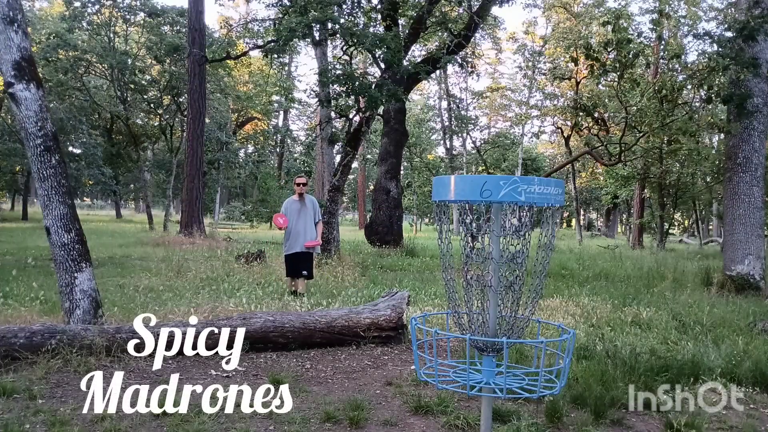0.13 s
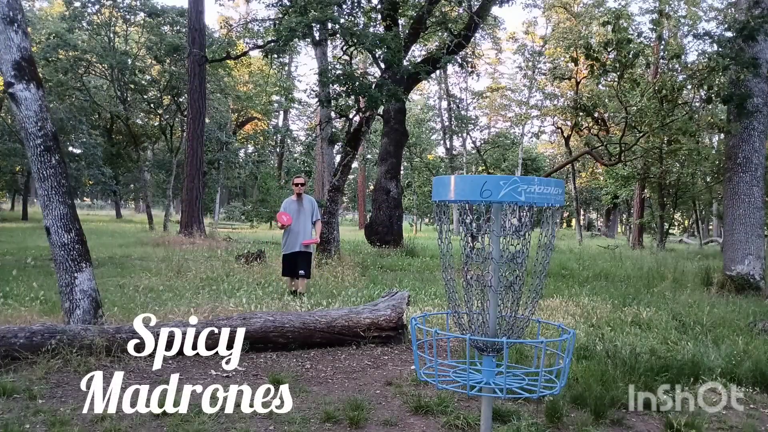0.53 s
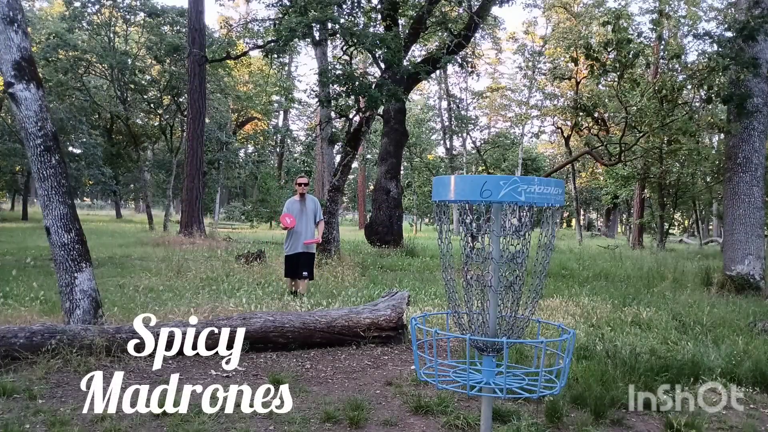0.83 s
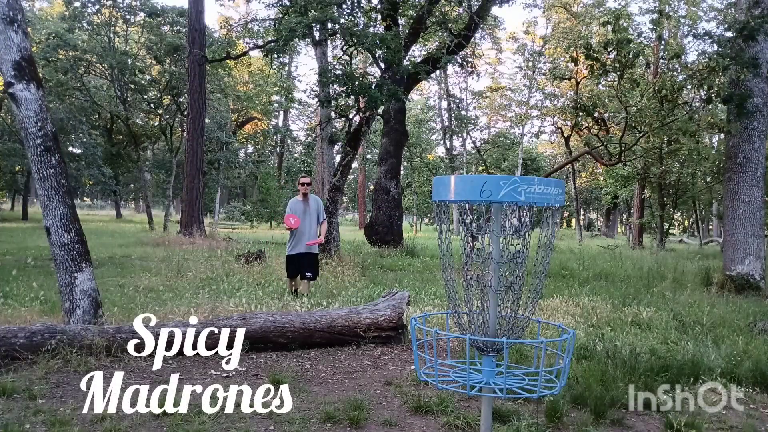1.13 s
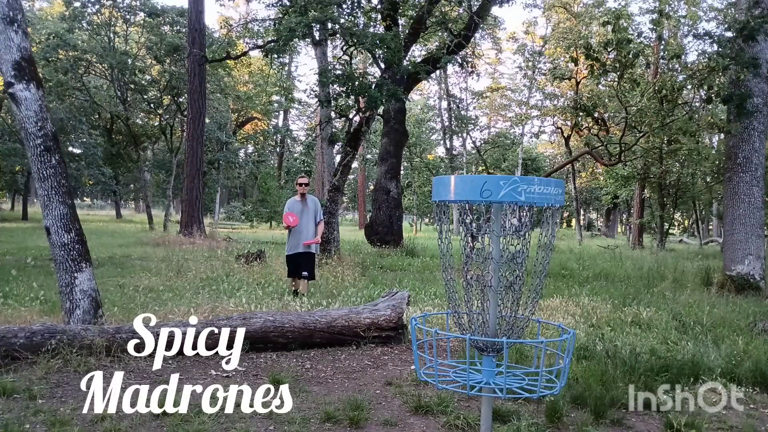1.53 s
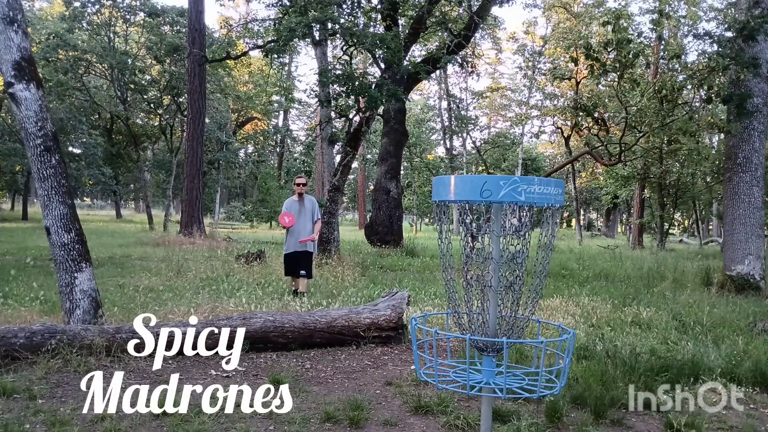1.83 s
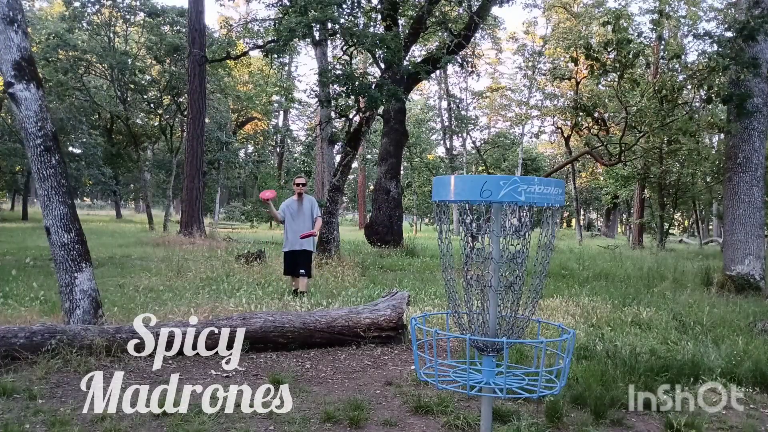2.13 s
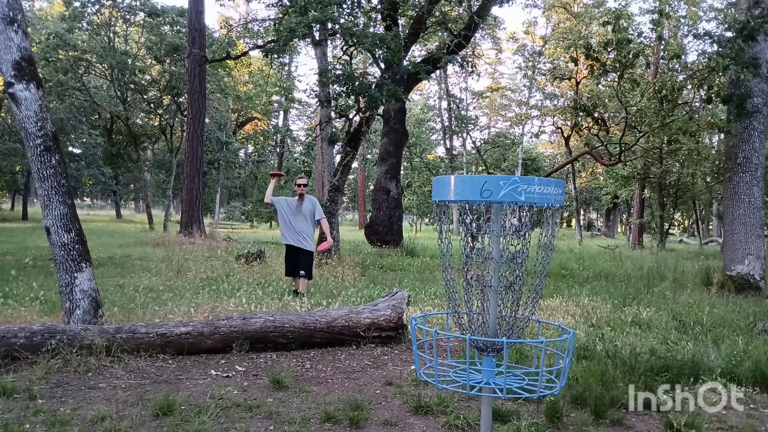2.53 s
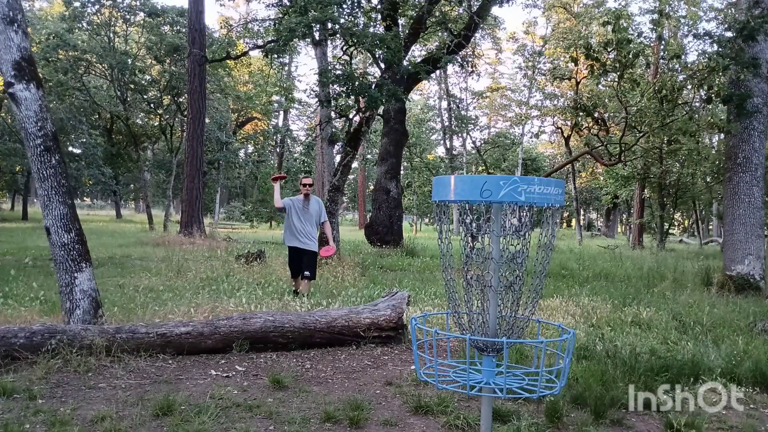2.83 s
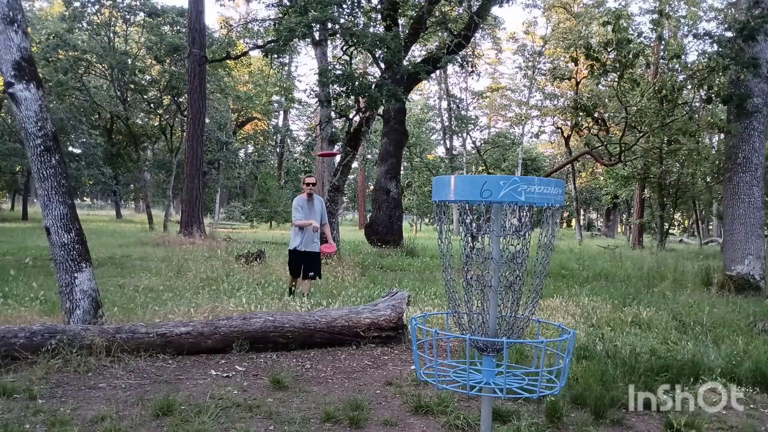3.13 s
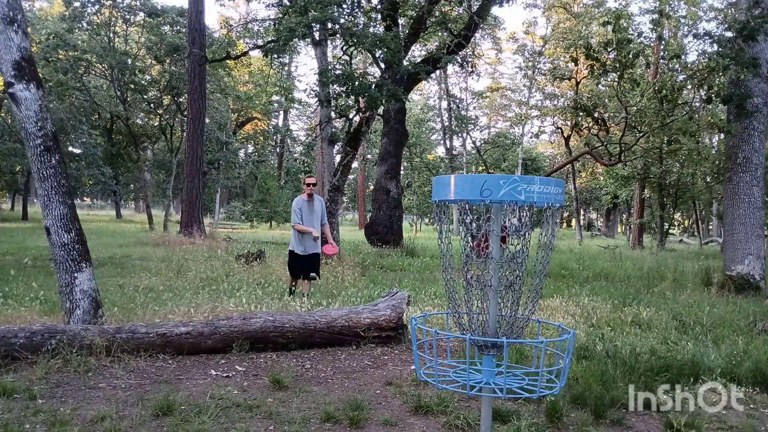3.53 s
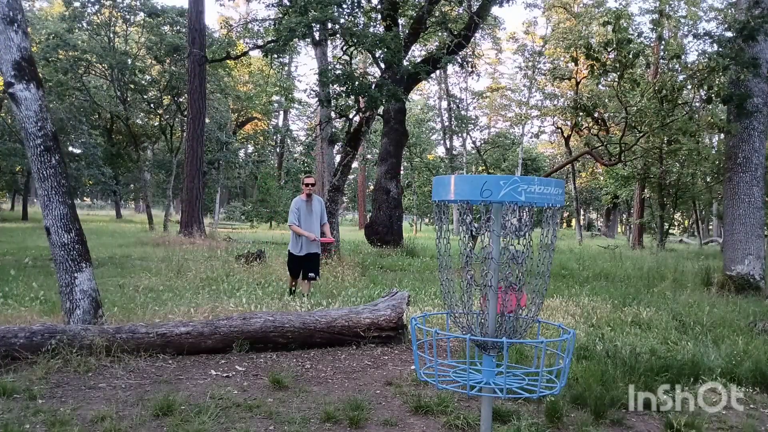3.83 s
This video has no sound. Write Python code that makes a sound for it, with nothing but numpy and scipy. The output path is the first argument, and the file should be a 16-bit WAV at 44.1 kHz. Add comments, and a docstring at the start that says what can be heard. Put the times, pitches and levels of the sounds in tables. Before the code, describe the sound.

Metal chains burst into loud jangling near the microphone as a disc strikes with a dull plastic knock; beforehand, only low far traffic, a faint engine hum and small bird calls among trees.

```python
"""Disc into a chain basket

In a wooded park, far traffic and a hum are heard first, with thin bird chips and a buzzy call.
Then a thrown disc hits the hanging chains of a metal basket, a little left of a two-port microphone.
Traffic is shaped noise, the hum is narrow noise, and the birds are gliding tones and noise notes.
Random blows make steel links ring and clatter; the plastic disc knocks in its own dying tones.
A gain control turns everything down under the loud rattle and recovers slowly.
"""
import sys
import numpy as np
from scipy import signal
from scipy.fft import rfft, irfft
from scipy.io import wavfile
from scipy.ndimage import uniform_filter1d

SR = 44100
rng = np.random.default_rng(int(sys.argv[2]) if len(sys.argv) > 2 else 0)


def ratio(d):
    """dB to gain"""
    e = np.asarray(d, float) / 20
    return 10 ** e


def output_pcm(signal):
    """Save a mono or channel-first signal as 16-bit PCM at the path in sys.argv[1].

    Samples are clipped to [-1, 1] before scaling.
    """
    pcm = np.clip(np.atleast_2d(signal).T, -1, 1) * 32767
    wavfile.write(sys.argv[1], SR, np.round(pcm).astype(np.int16))


N = 176400  # samples in the scene: 4 s

# Colour of far traffic and air: f/Hz, relative level/dB
ROAD_SPECTRUM = [(30, -24), (60, -23), (80, -7.5), (100, 2.5), (125, -4.5), (160, -5), (204, -11),
                 (260, -17), (337, -22.5), (434, -13.5), (558, -12.5), (825, -7), (1570, -15),
                 (1910, -19.5), (2990, -44), (4500, -47.5), (7520, -54), (11000, -57.5), (16000, -54)]
# Likeness of left and right traffic: f/Hz, likeness (1 = same, 0 = unrelated)
ROAD_LIKENESS = [(60, 0.95), (150, 0.95), (380, 0.52), (950, 0.0031), (2380, 0.00046), (5980, -0.096),
                 (15000, -0.16)]
# Slow traffic drift, used about its average: t/s, bass level/dB, low-middle level/dB
RUMBLE_DRIFT = [(0.0, -47.5, -59), (0.05, -54, -58.5), (0.31, -49, -60), (0.44, -48.5, -56.5),
                (0.78, -49, -59), (0.79, -48.5, -54), (1.09, -50.5, -61), (1.43, -50.5, -58),
                (2.64, -51.5, -63.5), (3.58, -56.5, -63)]
ROAD_RMS_DB, PATCHY_DB, SWELL_DB = -45, 0.9, -0.21
# Engine whine: t/s, f/Hz, level/dB
HUM_TRACK = [(0, 447.3, -55.5), (.5, 443, -61.5), (.75, 446.4, -55), (1.1, 447.4, -59.5), (1.4, 435, -53),
             (2.0, 438.5, -56), (2.6, 444, -62.5), (2.8, 443, -78), (3.5, 433.4, -65)]
HUM_WIDTH_HZ = 13.0  # of each of two resonances in a row

# Short bird notes: t/s, length/s, f/Hz, width/Hz, level/dB
BIRD_CHIPS = [(0.379, 0.026, 4540, 250, -67.5), (.385, 0.029, 3250, 250, -66),
              (0.41, 0.025, 4600, 200, -74), (0.451, .02, 3220, 250, -72), (0.457, 0.024, 4330, 250, -74),
              (1.274, 0.044, 7700, 60, -82), (1.325, .035, 7400, 80, -87), (1.41, .03, 7520, 80, -89),
              (2.544, .04, 7450, 49, -79), (2.66, .04, 7600, 100, -82), (2.764, .04, 7320, 80, -90)]
CHIP_FALL = 0.02  # share of its pitch that each chip drops
# Buzzy bird call: t/s, centre f/Hz, level/dB, tremble each way/Hz
BUZZY_CALL = [(.47, 3330, -59, 60), (.49, 3440, -61, 59.6), (.53, 3523, -64, 80), (.545, 3605, -54.5, 200),
              (.575, 3660, -73, 200), (.585, 3790, -64, 250), (.62, 3880, -59.5, 293),
              (.7, 3995, -61.5, 390), (.76, 3900, -62, 395), (.8, 3840, -66.5, 450), (.86, 3930, -73, 400)]
BUZZ_PER_S, BUZZ_WANDER = 170, 0.13
BIRD_ECHO_DB, BIRD_ECHO_T60_S = -1, 0.58

# How hard the links clash: t/s, clatter level/dB, low, middle and high ring levels/dB
CHAIN_SHAKE = [(3.608, -17, -41, -22, -28), (3.616, -19, -38, -32, -27), (3.632, -6, -20, -40, -7.5),
               (3.656, -21.5, -16, -3.5, -22), (3.692, -13.5, -10.5, -14.5, -18),
               (3.726, -33, -56, -44, -29), (3.744, -17, -17, -31, -44), (3.756, -30, -22, -20, -19),
               (3.782, -18, -25, -20, -20), (3.802, -18, -25, -30, -26), (3.818, -18, -9.5, -10, -12),
               (3.84, -18.5, -26, -26, -11), (3.858, -19, -15, -7, -24), (3.896, -23, -20, -19.5, -4),
               (3.936, -17.5, -22, -3, -34), (3.946, -17, -50, -36, -13), (3.966, -29.5, -23, -19, -20),
               (4.0, -20, -23, -25.5, -23)]
# Low ringing tones of the links: f/Hz, relative level/dB, time to fall 60 dB/s
LOW_LINK_MODES = [(3385, -13, .15), (3413, -6, .3), (3432, 0, .33), (3450, -6, .25), (3485, -12, .15)]
# Middle ringing tones of the links: f/Hz, relative level/dB, time to fall 60 dB/s
MIDDLE_LINK_MODES = [(9489, 0, .33), (9540, 0, .33), (9585, -3, .33), (9610, -8, .4), (9691, -9, .45),
                     (9793, -11, .4), (9945, -14, .3), (10092, -15, .4)]
# High tones differ from link to link, so each row is a crowd:
# centre f/Hz, spread/Hz, relative level/dB, time to fall 60 dB/s
HIGH_LINK_CROWDS = [(14150, 130, 0, .16), (14790, 90, -3, .16), (15350, 150, -13, .12),
                    (10150, 280, -8, .15)]
LINKS = 14  # tones in each crowd
RING_HITS_PER_S, RING_SIZE_DB = 220, 3.2
# Colour of short unpitched link contacts: f/Hz, relative level/dB
CLATTER_SPECTRUM = [(300, -43), (700, -19), (1530, -12), (2600, -20), (3100, -25.5), (3500, -7), (4500, -9),
                    (5700, -10.5), (7300, -9), (8600, -7), (9700, -8), (12300, -10.5), (14000, -3.5),
                    (15300, 2), (16000, -50)]
CLATTER_PER_S, CLATTER_SIZE_DB, CLATTER_T60_S = 1400, 4.2, 0.025  # rate over both strands
WIRE_T60_S, WIRE_DB = 0.085, -1  # wire level against the contacts
# Disc strikes chain and pole: t/s, level/dB, tilt/dB per octave
DISC_KNOCKS = [(3.608, -16, 5), (3.646, -8, -1.5), (3.752, -22.5, -1), (3.829, -36, 1)]
# Tones of the disc: f/Hz, relative level/dB, time to fall 60 dB/s
DISC_MODES = [(330, -7, .09), (500, -11, .05), (700, 3, .05), (955, 1, .05), (1150, -7, .05),
              (1550, -4, .07), (1780, -6, .05), (2300, -9, .04)]
KNOCK_RISE_S, SLAP_DB, SLAP_T60_S = 0.004, -9, 0.03
# Hard link clashes: t/s, crack level/dB, crack f/Hz, middle ring level/dB
HARD_CLASHES = [(3.609, -23, 4000, -48), (3.615, -10, 5720, -35), (3.621, -5, 5830, -17),
                (3.626, -18, 3920, -16), (3.637, -24, 5030, -12), (3.648, -3.5, 14900, -19),
                (3.659, -16.5, 10300, -10.5), (3.685, -36, 9800, -28), (3.795, -44, 7950, -13),
                (3.834, -31, 4500, -13), (3.886, -31, 7000, -28), (3.943, -18, 7000, -26.5)]
CLASH_T60_S, CLASH_WIDTH = 0.044, 0.44  # width as a share of the pitch

# Level difference of the ports: f/Hz, left minus right level/dB
PORT_LEVELS = [(300, 0), (1300, 1), (3400, 4), (5500, 1), (7500, 2), (9500, 6), (12000, 1), (14500, 0)]
# Full phase lead of the left port: f/Hz, lead/rad
PORT_LEAD = [(0, 0), (1700, .8), (3400, 2.5), (5200, 1.9), (6400, 3.1), (9500, 5.2), (16000, 8.3)]
NEAR_SHARE, FAR_SHARE = 0.94, 0.62  # shares of that lead; far strands hang more to the front
TREES_DB, TREES_T60_S = -7.5, 0.1
MIC_LOW_CUT_HZ, MIC_HIGH_CUT_HZ = 36.4, 15750
AGC_KNEE_DB, AGC_SHARE = -29, 0.3  # the gain drops by this share of the dB above the knee
AGC_FORGET_DB_PER_S = 25  # how fast a remembered peak sinks


def evened(x):
    """Scales a sound to an rms of 1."""
    return x / np.sqrt(np.mean(x ** 2) + 1e-20)


def read(points, hz):
    """Reads a table in even steps of pitch, with straight lines between its points."""
    f, value = np.transpose(points)
    return np.interp(np.log(hz + 1), np.log(f + 1), value)


def curve(rows, column):
    """Draws one column of a table as a line over the scene's time."""
    rows = np.array(rows)
    return np.interp(np.arange(N) / SR, rows[:, 0], rows[:, column])


def add(mix, s, sound):
    """Mixes a sound in at s seconds, cutting off what runs past the end."""
    part = mix[round(s * SR):][:len(sound)]
    part += sound[:len(part)]


def resonate(x, hz, width):
    """A resonance of peak gain 1 that can follow a pitch curve."""
    turn = np.exp(2j * np.pi * np.cumsum(hz * np.ones(len(x))) / SR)
    r = np.exp(-np.pi * width / SR)
    # Shift the pitch down to zero, smooth, then shift it back.
    return 2 * (turn * signal.lfilter([1 - r], [1, -r], x / turn)).real


def narrow_noise(count, hz, width):
    """Noise through two equal resonances in a row, which leaves a rough pitch."""
    return resonate(resonate(rng.standard_normal(count), hz, width), hz, width)


def colour(x, points):
    """Filters by a spectrum table without smearing sound ahead of its start."""
    db = np.maximum(read(points, np.fft.rfftfreq(2048, 1 / SR)), -100)
    log = np.log(ratio(np.r_[db, db[-2:0:-1]]))
    # This phase makes the filter answer as early as it can.
    response = np.fft.ifft(np.exp(log - 1j * signal.hilbert(log).imag)).real[:1024]
    return signal.oaconvolve(x, response)[:len(x)]


def clicks(count, per_s, size_db):
    """Sparse random blows of uneven size and sign, scaled to rms 1."""
    chance = rng.random(count)
    size = np.minimum(rng.exponential(1, count), 4)
    sign = rng.choice([-1., 1.], count)
    return evened((chance < per_s / SR) * sign * ratio(size_db * size) + 1e-9)


def ring(hz, t60):
    """A dying sine of energy 1, the answer of one tone to a blow."""
    t = np.arange(SR // 2) / SR
    tone = ratio(-60 * t / t60) * np.sin(2 * np.pi * hz * t)
    return tone / np.linalg.norm(tone)


def tail(t60):
    """Scattered echoes from trunks and ground, different in each channel, that die away."""
    t = np.arange(SR) / SR
    taps = rng.standard_normal((2, SR)) * (rng.random((2, SR)) < .05)
    taps = taps * ratio(-60 * t / t60) * (t > .002)
    return taps / np.linalg.norm(taps[0])


def road():
    """Far traffic: patchy, swelling noise whose low end drifts down overall as the traffic leaves."""
    frames, hz = N // 512 + 5, np.fft.rfftfreq(2048, 1 / SR)
    a, b, c, d, patches = rng.standard_normal((frames, 1025, 5)).T
    patches = uniform_filter1d(patches, size=16, axis=0)
    patches = evened(uniform_filter1d(patches, size=5, axis=1))
    swell = evened(uniform_filter1d(rng.standard_normal(frames), size=15))
    at = np.minimum(np.arange(frames) * 512, N - 1)
    bass, low = (curve(RUMBLE_DRIFT, column=k)[at] for k in (1, 2))
    is_bass, is_low = hz < 220, (hz >= 220) & (hz < 420)
    drift = is_bass[:, None] * (bass - bass.mean()) + is_low[:, None] * (low - low.mean())
    same = np.clip(read(ROAD_LIKENESS, hz), -1, 1)[:, None]
    left = a + 1j * b
    right = same * left + np.sqrt(1 - same ** 2) * (c + 1j * d)
    level_db = read(ROAD_SPECTRUM, hz)[:, None] + PATCHY_DB * patches + SWELL_DB * swell + drift
    spectra = np.array([left, right]) * ratio(level_db)
    wash = signal.istft(spectra, nperseg=2048, noverlap=1536)[1][:, :N]
    return ratio(ROAD_RMS_DB) * wash / np.sqrt(np.mean(wash.mean(0) ** 2))


def hum():
    """Engine whine: narrow noise that follows a pitch and level curve."""
    whine = narrow_noise(N, curve(HUM_TRACK, column=1), HUM_WIDTH_HZ)
    return ratio(curve(HUM_TRACK, column=2)) * evened(whine)


def bird_chips():
    """Thin short notes: narrow noise that falls slightly in pitch."""
    out, t = np.zeros(N), np.arange(4000) / SR
    for s, length, centre_hz, width, db in BIRD_CHIPS:
        hz = centre_hz * (1 + CHIP_FALL * (.5 - t / length))
        note = narrow_noise(len(t), hz, width)[:round(length * SR)]
        add(out, s, ratio(db) * evened(note) * np.hanning(len(note)) ** .5)
    return out


def buzzy_call():
    """A tone whose pitch trembles fast enough to sound like a buzz."""
    t = np.arange(N) / SR
    wander = uniform_filter1d(rng.standard_normal((2, N)), size=300)
    rate_wander, pitch_wander = BUZZ_WANDER * evened(wander)
    tremble = np.sin(2 * np.pi * np.cumsum(BUZZ_PER_S * (1 + rate_wander)) / SR) + pitch_wander
    hz = curve(BUZZY_CALL, column=1) + curve(BUZZY_CALL, column=3) * tremble
    fade = np.clip(np.minimum(t - BUZZY_CALL[0][0], BUZZY_CALL[-1][0] - t) / .01, 0, 1)
    return fade * ratio(curve(BUZZY_CALL, column=2)) * np.sin(2 * np.pi * np.cumsum(hz) / SR)


def birds():
    """Chips and buzzy call together, blurred by echoes from the trees."""
    calls = bird_chips() + buzzy_call()
    echo = signal.fftconvolve(calls[None], tail(BIRD_ECHO_T60_S), axes=1)[:, :N]
    return calls + ratio(BIRD_ECHO_DB) * echo


def link_ringing():
    """Random blows and hard clashes set off the links' tones; returns near and far strands."""
    start = round(CHAIN_SHAKE[0][0] * SR)
    n, strands = N - start, np.zeros((2, N))
    hard = np.zeros(N)
    for s, _, _, ring_db in HARD_CLASHES:
        add(hard, s, ratio(ring_db) * np.array([30.]))
    spots = (np.arange(LINKS) + rng.random(LINKS)) / LINKS * 4 - 2
    crowd = [(hz + spread * z, db - 4.3 * z ** 2, t60)
             for hz, spread, db, t60 in HIGH_LINK_CROWDS for z in spots]
    for column, modes in zip((2, 3, 4), (LOW_LINK_MODES, MIDDLE_LINK_MODES, crowd)):
        level = ratio(curve(CHAIN_SHAKE, column=column)[start:])
        total = np.linalg.norm([ratio(db) for _, db, _ in modes])
        for k, (hz, db, t60) in enumerate(modes):
            blows = level * clicks(n, RING_HITS_PER_S, RING_SIZE_DB)
            if column == 3:  # hard clashes drive only the middle ring
                blows = blows + hard[start:]
            # High tones take turns between strands; the others stay near.
            strand = k % 2 if column == 4 else 0
            strands[strand, start:] += ratio(db) / total * signal.fftconvolve(blows, ring(hz, t60))[:n]
    return strands


def clatter():
    """Short noisy link contacts and flicked basket wires, made separately for near and far strands."""
    start = round(CHAIN_SHAKE[0][0] * SR)
    n, t, strands = N - start, np.arange(4000) / SR, np.zeros((2, N))
    level = ratio(curve(CHAIN_SHAKE, column=1)[start:])
    for strand in strands:
        contacts, wires = np.zeros(n), np.zeros(n)
        for noise in rng.standard_normal((4, len(t))):
            grain = noise * ratio(-60 * t / CLATTER_T60_S)
            # Four grains on each of two strands share the full rate.
            contacts += signal.fftconvolve(clicks(n, CLATTER_PER_S / 8, CLATTER_SIZE_DB), grain)[:n]
        for hz in np.geomspace(3700, 13000, num=40) * rng.uniform(0.93, 1.03, size=40):
            wires += signal.fftconvolve(clicks(n, 40, 3.4), ring(hz, WIRE_T60_S))[:n]
        rattle = colour(evened(contacts) + ratio(WIRE_DB) * evened(wires), CLATTER_SPECTRUM)
        add(strand, start / SR, level * evened(rattle) / np.sqrt(2))
    return strands


def disc():
    """Each knock sets off the disc's dying tones with a short soft rise, plus a dull noise slap."""
    out, t = np.zeros(N), np.arange(8000) / SR
    for s, db, tilt_db in DISC_KNOCKS:
        body = np.zeros(len(t))
        for hz, mode_db, t60 in DISC_MODES:
            level = ratio(mode_db + tilt_db * np.log2(hz / 1000) - 60 * t / t60)
            body += level * np.sin(2 * np.pi * (hz * t + rng.random()))
        body *= np.minimum(t / KNOCK_RISE_S, 1)
        slap = evened(narrow_noise(len(t), 1900, 1500))
        slap = slap * ratio(SLAP_DB + tilt_db - 60 * t / SLAP_T60_S)
        add(out, s, ratio(db) * (body / 3 + slap))
    return out


def hard_clashes():
    """Cracks of dying, roughly pitched noise, taking turns between near and far strands."""
    strands, t = np.zeros((2, N)), np.arange(4000) / SR
    for k, (s, db, hz, _) in enumerate(HARD_CLASHES):
        crack = narrow_noise(len(t), hz, CLASH_WIDTH * hz)
        add(strands[k % 2], s, ratio(db - 60 * t / CLASH_T60_S) * evened(crack))
    return strands


def ports(x, share):
    """A near source reaches the two ports with a phase lead and a level difference."""
    hz = np.fft.rfftfreq(N + SR, 1 / SR)
    lead = share * np.interp(hz, *np.transpose(PORT_LEAD))
    # Each port takes half of the difference, in opposite directions.
    side = ratio(read(PORT_LEVELS, hz) / 2) * np.exp(.5j * lead)
    return irfft(rfft(x, N + SR) * np.array([side, 1 / side]), N + SR)[:, :N]


def scene():
    """Basket nearby with echoes from the trees; road, hum and birds around it."""
    background = road() + hum() + birds()
    near, far = link_ringing() + clatter() + hard_clashes()
    near = near + disc()
    echo = signal.fftconvolve((near + far)[None], tail(TREES_T60_S), axes=1)[:, :N]
    basket = ports(near, NEAR_SHARE) + ports(far, FAR_SHARE) + ratio(TREES_DB) * echo
    return basket + background


def band_limit(x):
    """A steep low-pass at the top of the band."""
    return signal.sosfilt(signal.butter(12, 16530, fs=SR, output="sos"), x)


def record(dry):
    """The microphone limits bass and treble; gain control pulls loud sound down and recovers slowly."""
    low_cut = signal.butter(2, MIC_LOW_CUT_HZ, "high", fs=SR, output="sos")
    heard = signal.sosfilt(low_cut, dry)
    heard = signal.oaconvolve(heard, signal.firwin(255, MIC_HIGH_CUT_HZ, fs=SR)[None], "same")
    # Power over the last 10 ms
    power = uniform_filter1d((heard ** 2).mean(0), size=440, origin=219)
    power_db = 10 * np.log10(abs(power) + 1e-12)
    # Remember the loudest level, letting that memory sink steadily.
    fall = np.arange(N) * AGC_FORGET_DB_PER_S / SR
    held_db = np.maximum.accumulate(power_db + fall) - fall
    over_db = np.maximum(held_db - AGC_KNEE_DB, 0)
    mix = heard / ratio(AGC_SHARE * uniform_filter1d(over_db, size=200))
    return band_limit(mix)


dry = scene()
out = record(dry)
output_pcm(out)
```